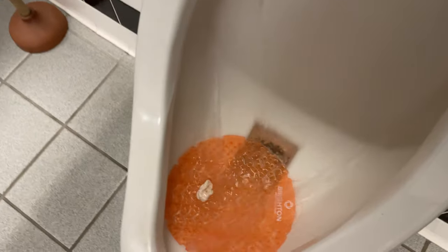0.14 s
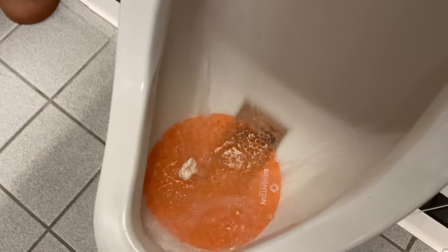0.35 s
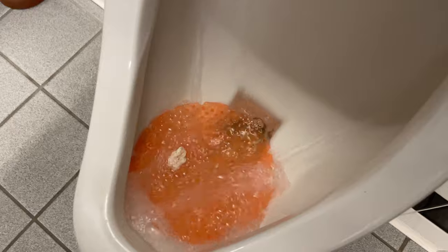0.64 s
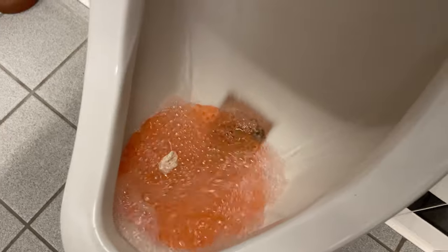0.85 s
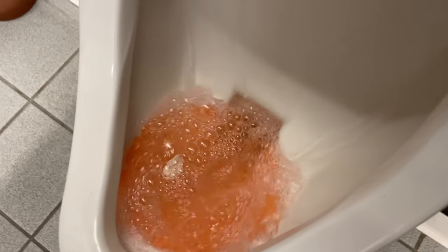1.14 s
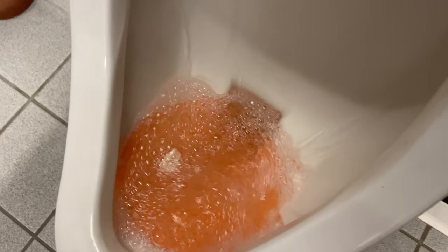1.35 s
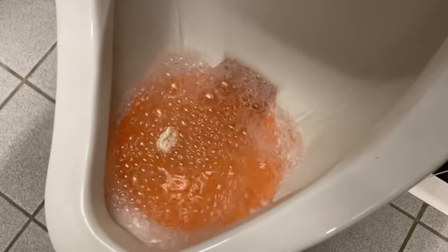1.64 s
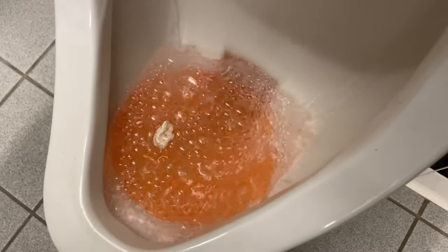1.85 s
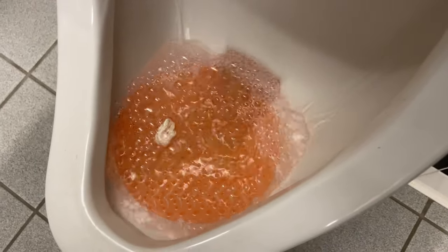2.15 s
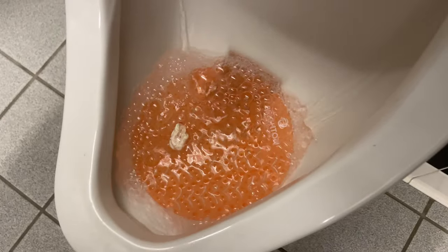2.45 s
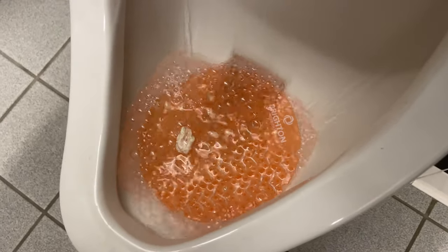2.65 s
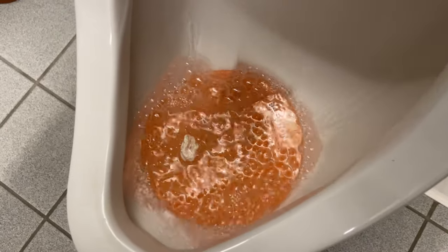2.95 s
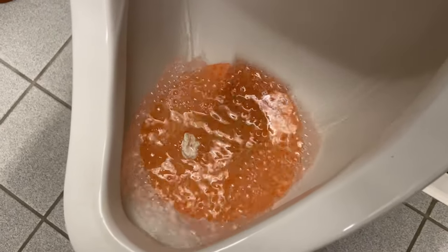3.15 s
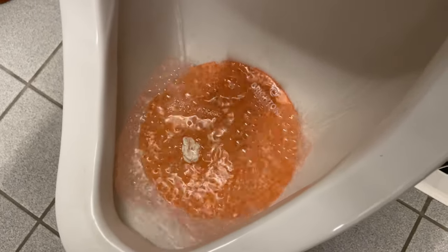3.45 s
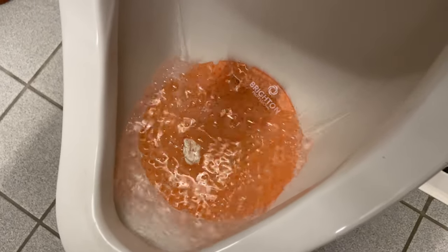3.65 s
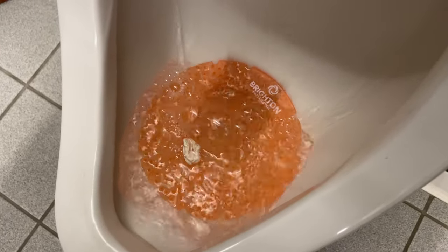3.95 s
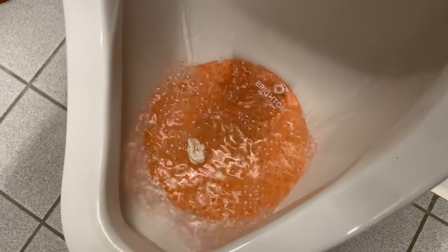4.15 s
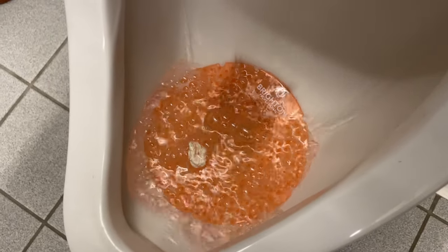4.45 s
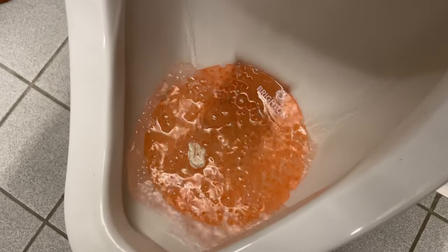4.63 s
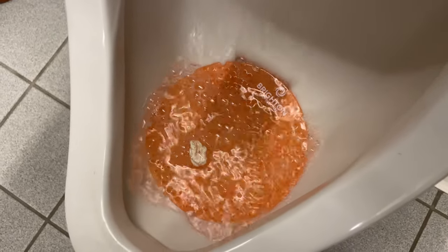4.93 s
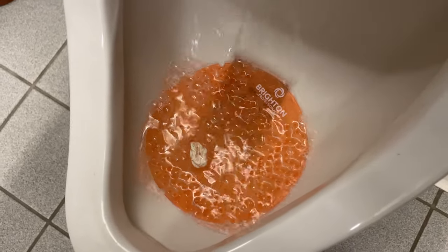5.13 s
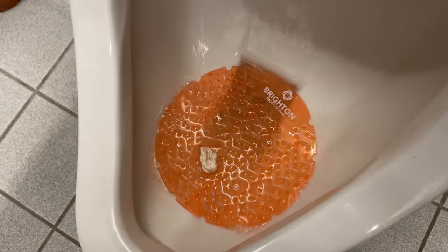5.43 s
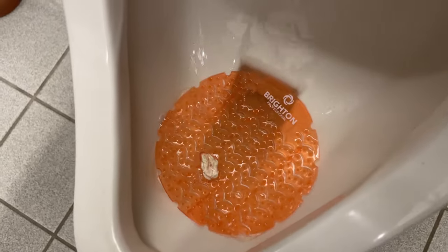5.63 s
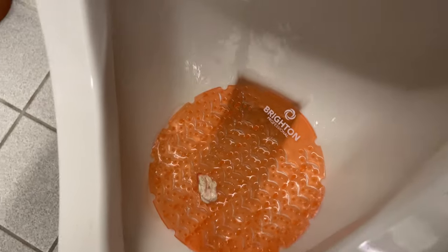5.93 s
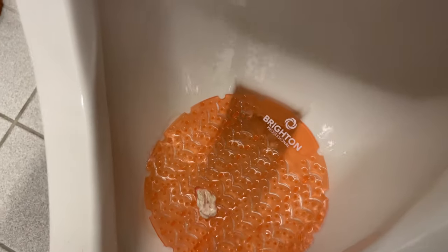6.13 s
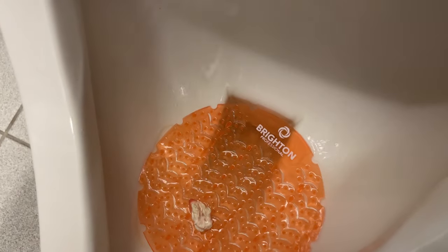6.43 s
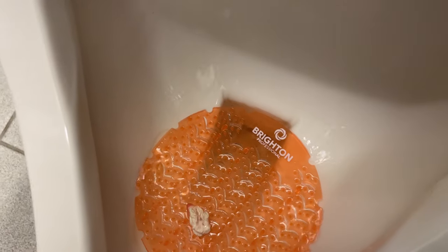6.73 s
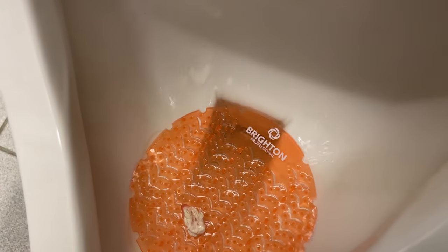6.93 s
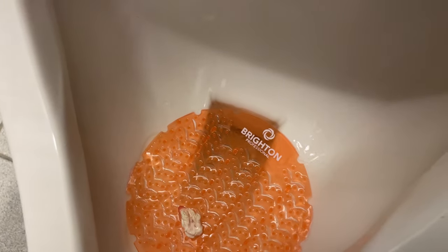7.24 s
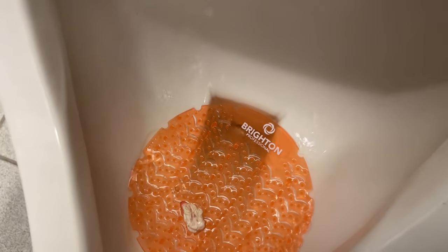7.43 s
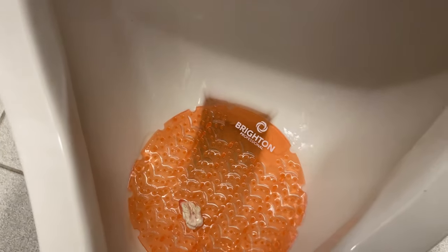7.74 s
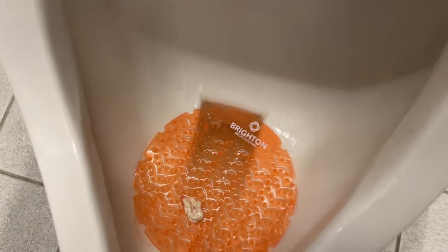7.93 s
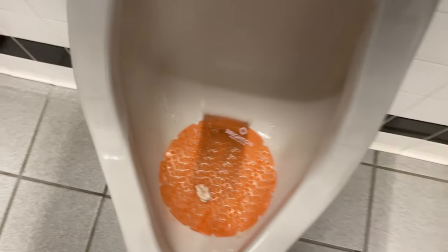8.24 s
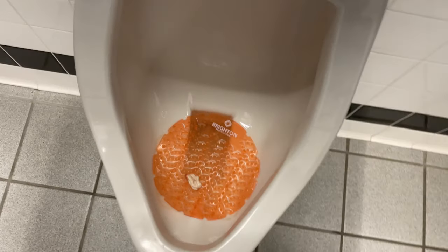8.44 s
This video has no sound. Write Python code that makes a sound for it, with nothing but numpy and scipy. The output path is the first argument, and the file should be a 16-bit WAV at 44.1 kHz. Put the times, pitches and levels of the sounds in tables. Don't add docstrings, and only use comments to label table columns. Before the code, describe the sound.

Close up in a tiled restroom, a urinal flush is already rushing, bright and hissing over a low drain roar. It fades over about five seconds while hollow bubbles glug in the trap. The flow stops with a ragged sputter, leaving fine drips and ticks. Suddenly the drain gurgles very loudly with fast, wet, throaty gulps, thins out, and finishes with a plop and a short slurp.

```python
import sys
import numpy as np
from scipy import signal
from scipy.fft import rfft, irfft, next_fast_len
from scipy.io import wavfile
from scipy.ndimage import uniform_filter1d

SR = 44100
rng = np.random.default_rng(int(sys.argv[2]) if len(sys.argv) > 2 else 0)


def magnitude_from_level(level_db):
    exponent = np.asarray(level_db, float) / 20
    return 10 ** exponent


def store_wav(level_fs):
    pcm = np.round(np.clip(np.atleast_2d(level_fs), -1, 1) * 32767)
    wavfile.write(sys.argv[1], SR, pcm.T.astype(np.int16))


N = 378357
SECONDS = np.arange(N) / SR
SIZE = next_fast_len(N + SR // 2)
HZ = np.arange(SIZE // 2 + 1) * SR / SIZE + 1e-3
PIPE_HZ, THROAT_HZ = 338.5, 1310
DRAINED_S = 7.8

# start_s, flow_db down the bowl, pull_db of the drain
FLOW = [(0.0, -20, -37), (0.2, -20, -39.5), (0.4, -24, -36.5), (0.65, -25.5, -39), (1.0, -28.5, -47),
        (1.7, -33, -40.5), (2.3, -35, -45.5), (3.3, -34, -45), (4.1, -36.5, -47.5), (4.65, -39, -43.5),
        (4.9, -42.5, -40), (5.2, -46.5, -38.5), (5.6, -58.5, -39), (6.3, -60.5, -37), (6.75, -60.5, -37),
        (6.97, -75, -33), (7.7, -62, -42.5), (8.58, -65.5, -43.5)]
# start_s, level_db, pitch_hz, splash_db
GULPS = [(6.836, -3.5, 573, -48), (6.868, -10.5, 360, -25.5), (6.895, -14, 472, -39), (6.916, -6, 506, -42),
         (6.927, -4.5, 585, -34), (6.957, -6.5, 560, -22), (6.961, -9, 404, -32), (6.977, -13.5, 362, -45),
         (6.987, -5, 712, -43), (7.016, -4, 590, -25), (7.045, -14, 295, -32), (7.069, -16, 310, -45),
         (7.071, -11, 650, -43), (7.088, -10.5, 357, -51), (7.103, -6, 570, -20.5), (7.108, -10, 338, -40),
         (7.15, -21, 730, -51), (7.165, -12, 620, -51), (7.187, -12, 350, -40), (7.19, -8, 585, -40),
         (7.214, -14, 350, -32), (7.214, -10, 610, -47), (7.237, -12.5, 323, -18.5),
         (7.239, -11.5, 730, -49), (7.315, -27, 550, -42), (7.338, -4, 744, -33), (7.341, -6.5, 370, -25.5),
         (7.377, -5, 566, -47), (7.434, -10, 660, -49), (7.437, -12.5, 342, -47), (7.473, -8.5, 687, -26.5),
         (7.505, -14, 654, -53), (7.539, -19.5, 314, -51), (7.563, -20, 570, -46), (7.604, -22, 328, -49),
         (7.613, -23, 345, -55), (7.642, -16.5, 390, -43), (7.704, -17, 640, -52), (7.716, -20, 650, -56),
         (7.97, -21, 347, -51), (8.029, -19.5, 400, -50), (8.04, -26, 560, -47), (8.058, -22, 630, -43),
         (8.068, -25, 690, -50), (8.077, -30, 640, -53)]


def flow():
    return drain_roar() + bowl_wash() + bowl_spray() + run_off()


def drain_roar():
    # pitch_hz, level_db per Hz
    rumble_spectrum = [(30, -11.5), (60, -7), (95, -7.5), (125, -7.5), (200, 0.5), (260, -6.5)]
    drone_spectrum = [(200, -3), (340, -4), (460, 2.5), (590, -4), (700, -18.5), (850, -4)]
    # start_s, pitch_hz, churn_db
    trap_air = [(0, 362, -32), (.8, 354, -36.5), (1.15, 329, -34.5), (1.5, 335, -35.5), (1.9, 291, -37),
                (2.4, 361, -30.5), (2.9, 398, -36), (3.4, 429, -33.5), (3.8, 434, -37.5), (4.3, 383, -41),
                (4.9, 352, -43), (6.7, 311, -45), (8.15, 347, -58.5), (8.58, 340, -43.5)]
    rumble = patchy(spray(300, 4.6, 0.032), rumble_spectrum, resonance(95, 17, 8), 1.5, 1.5, 7.8, count=3)
    churn = patchy(spray(300, 4.2, 0.31), drone_spectrum, tube(PIPE_HZ, 0.3), 1.5, 1.8, 22.0, count=3)
    bubbles = babble(np.transpose(trap_air)[:2], 1.114, per_s=150, cycles=12.2, swell=0.0014)
    drone = 0.62 * churn + 0.74 * bubbles
    throat = bursts()[1]
    rumble_gain = magnitude_from_level(in_time(FLOW)[1]) + magnitude_from_level(-19) * linger(throat, 0.017)
    drone_gain = magnitude_from_level(in_time(trap_air)[1]) + magnitude_from_level(-5.5) * linger(throat, 0.097)
    return rumble_gain * wide(rumble) + drone_gain * wide(drone)


def bowl_wash():
    # pitch_hz, level_db per Hz
    wash_spectrum = [(410, -104), (700, 5), (838, -2), (1370, 3), (1750, 0), (2400, -4), (3640, -8),
                     (6160, -120)]
    wash = patchy(spray(1500, 2.54, 0.54), wash_spectrum, tube(PIPE_HZ, 0.32), 1.0, 2.0, 22.0, count=4)
    spit, throat = bursts()
    level_db = in_time(FLOW)[0] - 5 + 10.5 * valve_shut() + 1.5 * first_rush()
    gain = magnitude_from_level(level_db) + magnitude_from_level(-6) * linger(np.sqrt(spit * throat), 0.0087)
    return gain * wide(wash)


def bowl_spray():
    # pitch_hz, level_db per Hz
    hiss_spectrum = [(1350, -9), (2400, -4), (3200, -1), (3740, 2), (6430, 2.5), (8870, -4), (11000, 3.5),
                     (13400, -6), (14200, -4.5), (15000, -65)]
    trickle_spectrum = [(1350, -41), (2300, -2.5), (3170, -2), (5240, 4), (9150, -7), (11700, -6),
                        (15000, -20)]
    hiss = patchy(spray(6000, 6.6, 0.33), hiss_spectrum, tube(PIPE_HZ, 0.065), 0.58, 2.55, 27.0, count=8)
    trickle = patchy(spray(600, 3.5, .3), trickle_spectrum, tube(THROAT_HZ, .25), 2.2, 3.2, 22.0, count=5)
    fizz = babble([[0, 9.9], [3600, 4050]], 3.19, per_s=160, cycles=26.0, swell=0.0006)
    foam = np.clip((SECONDS - 6.08) / 0.15, 0, 1) * (SECONDS < DRAINED_S)
    pops = babble([[0, 9], [5700, 5700]], 1.19, per_s=260, cycles=9.5, swell=0.0008)
    crackle = magnitude_from_level(-3) * foam * drift(10, 2.3) * pops
    treble = filtered(hiss, 1 / (1 + (9000 / HZ) ** 6))
    hiss = hiss - 0.68 * first_rush() * treble
    shut = valve_shut()
    bright = (1 - shut) * (hiss + 0.22 * fizz) + shut * (trickle + 0.6 * fizz + crackle)
    return magnitude_from_level(in_time(FLOW)[0]) * wide(bright)


def run_off():
    # pitch_hz, level_db per Hz
    murmur_spectrum = [(380, -30), (460, 1.5), (620, 0), (800, -10.5), (1050, -3), (1300, -26)]
    murmur = patchy(spray(400, 4.0, .2), murmur_spectrum, 1, 1.5, 2.5, 20.0, count=3)
    return magnitude_from_level(-49.5) * valve_shut() * wide(murmur)


def valve_shut():
    return np.clip((SECONDS - 5.55) / 0.02, 0, 1)


def first_rush():
    return np.exp(-SECONDS / 0.2)


def gurgle():
    # start_s, level_db
    knocks = [(6.835, -26), (6.927, -21.5), (6.962, -14), (7.042, -28), (7.11, -16.5), (7.14, -31),
              (7.181, -26), (7.215, -18), (7.234, -12), (7.32, -32), (7.344, -17.5), (7.364, -25),
              (7.39, -34), (7.434, -21), (7.471, -7), (7.501, -16), (7.628, -23), (7.646, -31)]
    body, splash = np.zeros(N), np.zeros(N)
    for s, db, hz, splash_db in GULPS:
        add(body, s, bubble(db, hz, t60=0.015 + 10.5 / hz, swell=0.00096, rise=0.15))
        add(body, s, bubble(db - 6, 1.15 * hz, t60=0.006, swell=.0004, rise=-0.1))
        add(splash, s - .002, puff(splash_db + 11.5, t60=0.034))
    add(body, 6.865, bubble(-22, 2250, 0.045, swell=0.004, rise=-0.3))
    add(body, 6.928, bubble(-12.5, 954, 0.03, swell=0.0028, rise=0.042))
    for s, db in knocks:
        add(body, s, wet_bubble(db - 2.5, 1.015 * THROAT_HZ, t60=0.036, swell=0.0041, rough=0.21))
        add(body, s, wet_bubble(db - 22.0, 2.03 * THROAT_HZ, t60=0.036, swell=0.002, rough=0.6))
    add(body, 7.807, bubble(-12, 800, t60=.014, swell=0.00055, rise=-0.1))
    add(body, 7.806, bubble(-26.5, 3.15 * 800, t60=0.0027, swell=0.00024, rise=0.21))
    colour = [(700, -49), (1300, 6.5), (2600, 5.5), (5000, -4.5), (13000, -36), (16000, -42)]
    echo = np.minimum(.78, 2.8 / (1 + (HZ / 3500) ** 2))
    ringing = tube(THROAT_HZ, echo) * magnitude_from_level(at_hz(colour, HZ))
    return filtered(body, resonance(PIPE_HZ, 30, 0.0)) + filtered(splash, ringing)


def sputter():
    # pitch_hz, level_db per Hz
    spit_spectrum = [(1500, -18), (2400, -6.5), (2730, -1), (3200, -16.5), (4200, -5.5), (5300, -4),
                     (6900, -6.5), (8100, -13), (11500, -10.5), (13600, -13), (14400, -40)]
    slurp_spectrum = [(1500, -23), (2500, -6), (4200, 9), (5800, 2), (8000, -12.5), (11000, -24.5),
                      (15000, -21)]
    throat_spectrum = [(120, -57), (200, -7), (339, -5), (531, -4.5), (694, -6.5), (1700, -20.5),
                       (2210, -27), (3740, -120)]
    fizz = babble([[0, 9], [3800, 3800]], 4.0, per_s=280, cycles=10.0, swell=.001)
    ragged = spray(2500, 4.0, .22) + .45 * fizz
    both_tubes = tube(PIPE_HZ, .3) * tube(1.03 * THROAT_HZ, .45)
    spit = patchy(ragged, spit_spectrum, both_tubes, 1.8, 2.6, 40.0, count=7)
    slurp = patchy(ragged, slurp_spectrum, tube(PIPE_HZ, .2), 2.2, 2.8, 45.0, count=5)
    plops = babble([[0, 8.5], [520, 554]], 3.59, per_s=210, cycles=8.8, swell=0.00073)
    lumpy = 0.33 * plops + .5 * spray(400, 5.4, 0.55)
    low = patchy(lumpy, throat_spectrum, tube(PIPE_HZ, 0.57), 1.03, 1.8, 45.0, count=2)
    colour = [(900, -20), (1300, 0), (2700, -6), (4000, -19), (7000, -38)]
    whistle = patchy(ragged[::-1], colour, tube(1.015 * THROAT_HZ, .87), 2.2, 2.0, 40.0, count=3)
    low = low + magnitude_from_level(-19.5) * whistle
    spit_gain, throat_gain = bursts()
    tearing = np.where(SECONDS > DRAINED_S, slurp, spit * flutter())
    return spit_gain * tearing + throat_gain * low


def bursts():
    # start_s, length_s, spit_db, throat_db
    air_bursts = [(4.71, 0.11, -25.5, -87), (4.78, 0.23, -42, -36.5), (4.934, 0.04, -50, -29.5),
                  (4.988, 0.049, -37.5, -39), (5.046, 0.045, -41, -35), (5.083, 0.079, -33.5, -35),
                  (5.178, 0.038, -38, -40), (5.22, 0.084, -45.5, -33), (5.351, 0.13, -48, -28.5),
                  (5.502, 0.031, -43, -34.5), (6.833, 0.23, -52, -21.5), (7.057, 0.039, -43, -27),
                  (7.177, 0.061, -57, -17), (7.326, 0.06, -47.5, -21), (7.422, 0.12, -75, -27.5),
                  (7.598, 0.057, -71, -25.5), (7.707, 0.032, -75, -39), (7.914, 0.064, -35, -25.5),
                  (7.994, 0.098, -32, -33), (8.124, 0.14, -59.5, -49), (8.555, 0.011, -37.5, -53)]
    t = np.arange(N // 32 + 2) * 32 / SR
    s, length, spit_db, throat_db = np.transpose(air_bursts)[..., None]
    rise_db, fall_db = 3002 * (t - s), 698 * (s + length - t)
    shape = np.minimum(0, np.minimum(rise_db, fall_db))
    gains = []
    for db in (spit_db, throat_db):
        total = magnitude_from_level(np.maximum(db + shape, -200)).sum(axis=0)
        gains.append(np.interp(SECONDS, t, total))
    return gains


def flutter():
    turn = np.cumsum(150 * drift(40, 2.0)) / SR
    ticks = rms_one(magnitude_from_level(-20 * (turn % 1)) + .05)
    return np.where((SECONDS > 4.97) & (SECONDS < 5.222), ticks, 1)


def glugs():
    # start_s, level_db, pitch_hz
    air_pockets = [(0.345, -17.5, 442), (0.432, -20, 418), (0.472, -18.5, 458), (0.584, -25, 365),
                   (0.212, -31, 335), (0.535, -30, 350), (0.657, -28, 347), (1.054, -29.5, 343),
                   (1.099, -33, 335), (1.304, -32, 342), (1.405, -24, 398), (1.449, -34, 339),
                   (1.537, -28, 330), (1.694, -30.5, 280), (1.88, -27.5, 267), (1.918, -27, 302),
                   (1.149, -33.5, 338), (1.208, -30, 330), (2.137, -22.5, 282), (2.19, -42, 305),
                   (2.231, -28.5, 310), (2.276, -27, 326), (2.321, -32, 338), (2.46, -33, 356),
                   (2.599, -30, 367), (2.7, -25, 393), (2.368, -20.5, 338), (2.427, -22.5, 328),
                   (2.496, -18, 385), (2.544, -19.5, 340), (2.664, -23.5, 389), (2.796, -15, 417),
                   (2.883, -25.5, 375), (3.023, -21, 448), (3.128, -20, 494), (3.183, -21.5, 375),
                   (3.266, -17, 395), (3.338, -10.5, 433), (3.415, -25, 386), (3.488, -15.5, 429),
                   (3.514, -18.5, 374), (3.55, -19, 412), (3.61, -18, 420), (3.857, -22.5, 528),
                   (4.121, -18.5, 408), (4.13, -25.5, 584), (4.325, -30, 572), (4.337, -22, 412),
                   (4.048, -30, 424), (5.24, -28, 679), (5.242, -29.5, 344), (5.52, -27.5, 702),
                   (5.709, -31.5, 686)]
    out = np.zeros(N)
    for s, db, hz in air_pockets:
        add(out, s - .004, bubble(db, hz, t60=0.081, swell=0.0022, rise=0.059))
    return filtered(out, tube(PIPE_HZ, 0.62))


def drips():
    # start_s, level_db
    spray_spits = [(3.302, -11.5), (3.887, -8.5), (3.971, -11), (4.704, -13.5), (5.135, -13), (5.533, -22),
                   (5.2834, -11.5), (5.3374, -9.5), (5.406, -25), (5.844, -24), (5.935, -35), (6.535, -37),
                   (6.8378, -16.5), (6.906, -19), (6.961, -16), (7.017, -17.5), (7.0425, -17.5),
                   (7.1097, -12.5), (7.181, -24), (7.193, -15), (7.221, -21), (7.238, -19), (7.3436, -14.5),
                   (7.439, -16.5), (7.515, -23), (7.8065, -34), (7.913, -25), (7.97, -16), (8.015, -15),
                   (8.057, -17), (8.077, -18)]
    # start_s, level_db
    spray_ticks = [(5.3843, -41), (5.4063, -28), (5.502, -32), (5.5778, -51), (5.681, -45), (5.783, -38.5),
                   (5.8457, -42), (5.8986, -49), (5.9335, -48), (5.952, -40), (5.9984, -48), (6.0632, -44),
                   (6.0982, -44), (6.1351, -52), (6.1939, -53), (6.2229, -47), (6.2458, -52), (6.3127, -56),
                   (6.3531, -46), (6.4698, -47), (6.5317, -55), (6.5641, -56), (6.588, -45), (6.6499, -53),
                   (6.7038, -45), (6.8026, -53)]
    out, spits, small = np.zeros(N), np.zeros(N), []
    for s, db, hz in all_drips():
        add(out, s, wet_bubble(db - 7, hz, 0.024 + 16 / hz, swell=0.0022, rough=.9))
        add(out, s, bubble(db - 10, 1.2 * hz, 6.0 / hz, swell=0.0003, rise=0.3))
        add(spits, s - .002, puff(db - 1, t60=0.026))
        small += shed(s, db - 11, hz, spread=1.45, within_s=0.016, count=3)
    for s, _, _, splash_db in GULPS:
        small += shed(s, splash_db - 12, 2800, spread=3.0, within_s=.04, count=9)
    for s, sound in small:
        add(out, s, sound)
    for s, db in spray_spits:
        add(spits, s - .002, puff(db + 6.0, t60=0.03))
    for s, db in spray_ticks:
        add(spits, s - .002, np.diff(puff(db + 18, t60=0.033)))
    colour = [(600, -5.5), (1500, -8.5), (5000, 0.0), (8000, -11.5), (11000, -5.5), (13600, -18), (16200, -34)]
    return out + filtered(spits, magnitude_from_level(at_hz(colour, HZ)) * tube(THROAT_HZ, 0.14))


def all_drips():
    # start_s, level_db, pitch_hz
    plain_drops = [(2.825, -24, 5230), (3.376, -22, 4800), (3.695, -26, 5100), (3.973, -17.5, 2810),
                   (4.569, -23.5, 4170), (5.226, -21.5, 2690), (5.309, -24, 2810), (5.364, -25, 2650),
                   (5.485, -20, 1015), (5.677, -39, 990), (5.607, -30.5, 1570), (5.694, -37, 1004),
                   (5.77, -31.5, 1750), (5.85, -35, 2250), (5.954, -28.5, 1030), (5.894, -37, 1054),
                   (6.034, -40, 1030), (6.076, -40, 1340), (6.145, -51, 1010), (6.192, -41, 1040),
                   (6.27, -37, 1010), (6.353, -28.5, 1120), (6.59, -25, 1356), (6.858, -19, 2610),
                   (7.024, -21, 2970), (7.97, -17, 5150), (8.018, -15.5, 4150), (8.058, -34, 4300),
                   (8.554, -35, 2400)]
    trickle_drops = [(5.5774, -29.5, 4760), (5.6396, -37.5, 3300), (5.694, -40, 5340), (5.722, -39.5, 2910),
                     (5.7524, -47, 5500), (5.7828, -41, 2920), (5.8506, -38, 2300), (5.935, -36, 4680),
                     (5.9879, -35.5, 3930), (6.0336, -34, 2430), (6.087, -37.5, 2900), (6.1275, -38, 5300),
                     (6.1455, -39, 2900), (6.1859, -43, 4100), (6.224, -32, 3770), (6.249, -36, 2710),
                     (6.2772, -40, 2720), (6.3121, -41, 4600), (6.3281, -37, 2740), (6.354, -33, 5500),
                     (6.39, -40, 4090), (6.4026, -35, 2800), (6.4378, -45, 2740), (6.471, -32, 5680),
                     (6.501, -39, 4000), (6.5338, -25.5, 3800), (6.5665, -33.5, 4040), (6.6798, -43, 6140),
                     (6.7047, -49, 3730)]
    surface_pockets = [(2.345, -26, 1630), (2.44, -29, 1370), (2.523, -24, 1190), (2.648, -30, 1330),
                       (2.776, -29, 1490), (2.894, -27, 1650), (3.06, -17.5, 883), (3.153, -22, 1060),
                       (3.219, -26.5, 1450), (3.251, -24, 740), (3.301, -21.5, 723), (3.41, -31, 1440),
                       (3.46, -29, 1020), (3.484, -20.5, 683), (3.551, -36, 950), (3.58, -31, 1670),
                       (3.658, -32, 1640), (3.759, -27, 1660), (3.797, -32, 695), (3.836, -28, 1140),
                       (3.887, -23, 1450), (4.151, -33, 1950), (4.207, -38, 980), (4.236, -29, 1060),
                       (4.343, -23, 702), (4.41, -31, 1310), (4.444, -30, 1680), (4.569, -31, 1670),
                       (4.592, -29, 1685), (4.621, -36, 1660)]
    drops = [(s, db - 1, hz) for s, db, hz in trickle_drops]
    pockets = [(s, db - 1.5, hz) for s, db, hz in surface_pockets]
    return plain_drops + drops + pockets


def surges():
    # start_s, level_db, pitch_hz
    thuds = [
        (0.451, -33.5, 151),
        (0.898, -42, 156),
        (5.121, -30.5, 82),
        (5.25, -43, 71.4),
        (6.199, -31.5, 77.6),
        (6.449, -33, 103),
        (6.699, -30.5, 72),
        (6.931, -22, 94),
        (7.971, -25.5, 102.2),
    ]
    out = np.zeros(N)
    for s, db, hz in thuds:
        add(out, s, bubble(db, hz, t60=0.42, swell=0.02, rise=0.074))
    return out


def bubble(db, hz, t60, swell, rise):
    t = np.arange(int(1.5 * t60 * SR)) / SR
    shape = (1 - np.exp(-t / swell)) ** 2 * magnitude_from_level(-60 * t / t60)
    return magnitude_from_level(db) * shape / shape.max() * np.sin(2 * np.pi * hz * (t + rise * t ** 2 / t60))


def wet_bubble(db, hz, t60, swell, rough):
    shake = np.repeat(rng.standard_normal((2, 80)), 88, axis=1)
    shake = uniform_filter1d(shake, size=88, axis=1)
    clean = bubble(db, hz, t60, swell, rise=0.015)
    turned = np.imag(signal.hilbert(clean))
    return clean * (1 + rough * shake[0, :len(clean)]) + rough * shake[1, :len(clean)] * turned


def babble(centre_hz, spread, per_s, cycles, swell):
    out = np.zeros(N)
    for place, pitch, size in rng.random((2500, 3))[:int(per_s * N / SR)]:
        s = place * N / SR
        hz = np.interp(s, *centre_hz) * spread ** (pitch - .5)
        add(out, s, bubble(-16 * size, hz, 3 * cycles / hz, swell, rise=0.047))
    return rms_one(out)


def shed(s, db, hz, spread, within_s, count):
    small = []
    for wait, pitch, size, glide in rng.random((count, 4)):
        own_hz = hz * spread ** (pitch - .5)
        sound = bubble(db - 9 * size, own_hz, .006 + 10 / own_hz, swell=.001, rise=.08 * (glide - .4))
        small.append((s + within_s * wait, sound))
    return small


def puff(db, t60):
    t = np.arange(int(.15 * SR)) / SR
    lumps = np.repeat(rng.standard_normal(len(t) // 64 + 1), 64)[:len(t)]
    swell = (1 - np.exp(-t / 0.004)) ** 2
    return magnitude_from_level(db - 60 * t / t60 + 2.0 * lumps) * swell * rng.standard_normal(len(t))


def spray(per_s, spread_db, share):
    sizes = magnitude_from_level(spread_db * np.minimum(rng.exponential(1, N), 5)) * (rng.random(N) < per_s / SR)
    clicks = rms_one(sizes * rng.choice([-1, 1], N))
    share = np.clip(share, 0, 1)
    return np.sqrt(1 - share) * rng.standard_normal(N) + np.sqrt(share) * clicks


def patchy(x, spectrum, response, together_db, own_db, rate, count):
    low, high = spectrum[0][0], spectrum[-1][0]
    whole = rfft(x, SIZE) * magnitude_from_level(at_hz(spectrum, HZ)) * response * (HZ > low) * (HZ < high)
    place = (count - 1) * np.log(HZ / low) / np.log(high / low)
    out = 0
    for k in range(count):
        band = irfft(whole * np.clip(1 - np.abs(place - k), 0, 1), SIZE)[:N]
        out = out + band * drift(rate, own_db)
    return rms_one(out * drift(rate, together_db))


def drift(rate, spread_db):
    r = np.exp(-80 * np.pi * rate / SR)
    slow = signal.lfilter([1], [1, -2 * r, r * r], rng.standard_normal(N // 40 + 2002))[2000:]
    gain = magnitude_from_level(spread_db * rms_one(slow - slow.mean()))
    return np.interp(np.arange(N) / 40, np.arange(len(slow)), gain)


def linger(gain, seconds):
    r = np.exp(-1 / (seconds * SR))
    return signal.lfilter([1 - r], [1, -r], gain)


def tube(spacing_hz, echo):
    return 1 / (1 - np.clip(echo, 0, .93) * np.exp(-2j * np.pi * HZ / spacing_hz))


def resonance(hz, width_hz, db):
    return 1 + magnitude_from_level(db) / (1 + 2j * (HZ - hz) / width_hz)


def wide(layer):
    return np.array([layer, layer[::-1]])


def add(track, s, sound):
    i = max(round(s * SR), 0)
    track[i:i + len(sound)] += sound[:N - i]


def in_time(rows):
    s, *columns = np.transpose(rows)
    return [np.interp(SECONDS, s, c, -200, -200) for c in columns]


def at_hz(points, hz):
    points = np.array(points)
    return np.interp(np.log(hz), np.log(points[:, 0]), points[:, 1])


def filtered(x, response):
    return irfft(rfft(x, SIZE) * response, SIZE)[..., :N]


def rms_one(x):
    return x / np.sqrt(np.mean(x ** 2) + 1e-20)


def reflections(t60, after_s, dullness):
    t = np.arange(SR // 2) / SR
    tail = rng.standard_normal(len(t)) * magnitude_from_level(-60 * t / t60) * (t > after_s)
    tail = signal.lfilter([1], [1, -dullness], tail)
    return rfft(tail / np.sqrt(np.sum(tail ** 2)), SIZE)


def scene():
    # pitch_hz, level_db
    port_balance = [(60, -1.5), (240, -0.5), (950, 0), (3770, 0.5), (15000, 0.0)]
    # pitch_hz, level_db
    port_skew = [(50, -22), (250, -16), (700, -7.5), (1400, -9), (3000, -6), (6000, -7), (9000, -3),
                 (13000, 1.5)]
    # pitch_hz, level_db
    diffuse = [(50, -20), (330, -9.5), (800, -1.5), (1400, -4.5), (3000, -0.5), (6000, -4), (9000, 4.5),
               (14000, -36)]
    water = flow()
    drain = sputter() + surges() + glugs() + gurgle() + drips()
    room = magnitude_from_level(-20) * reflections(0.41, 0.01085, 0.79)
    mid = filtered(water[0] + drain, 1 + room)
    bowl = reflections(.1, .0008, .05)
    bowl = bowl / np.maximum(1, np.abs(bowl)) / (1 + (1200 / HZ) ** 2)
    scattered = .9 * water[1] + filtered(.4 * water[0] + drain, bowl)
    side = filtered(mid, 1j * magnitude_from_level(at_hz(port_skew, HZ))) + filtered(scattered, magnitude_from_level(at_hz(diffuse, HZ)))
    balance = magnitude_from_level(at_hz(port_balance, HZ) / 2)
    return np.array([filtered(mid + side, balance), filtered(mid - side, 1 / balance)])


def band_limit(x):
    return signal.sosfilt(signal.butter(12, 16300, fs=SR, output="sos"), x)


def record(dry):
    low_cut = signal.butter(3, 42, "high", fs=SR, output="sos")
    mix = 1.242 * np.tanh(signal.sosfilt(low_cut, dry) / 1.416)
    return band_limit(mix)


dry = scene()
out = record(dry)
store_wav(out)
```